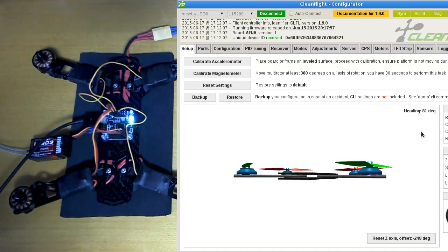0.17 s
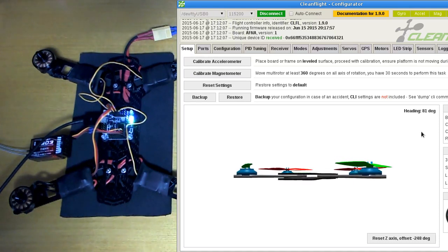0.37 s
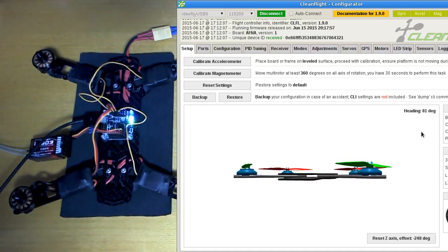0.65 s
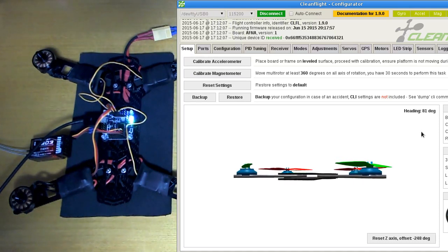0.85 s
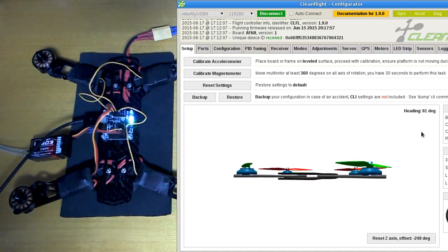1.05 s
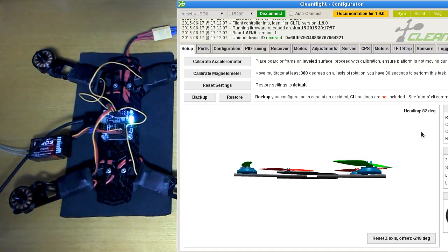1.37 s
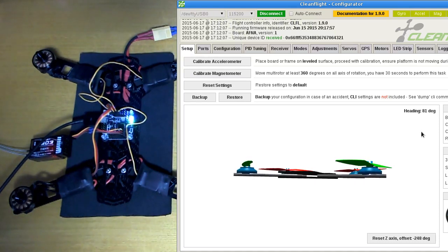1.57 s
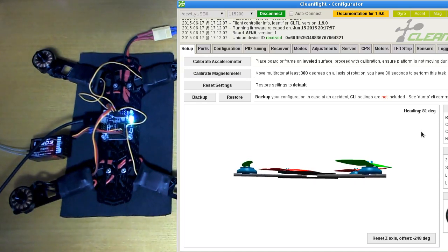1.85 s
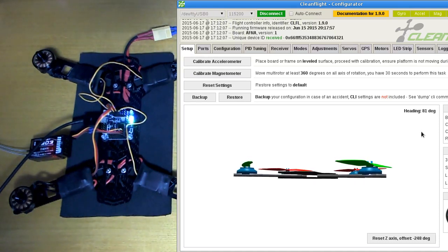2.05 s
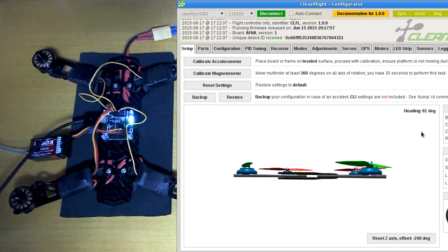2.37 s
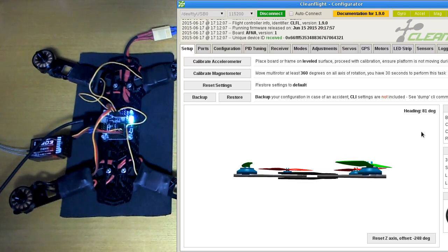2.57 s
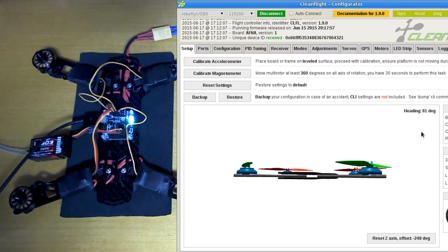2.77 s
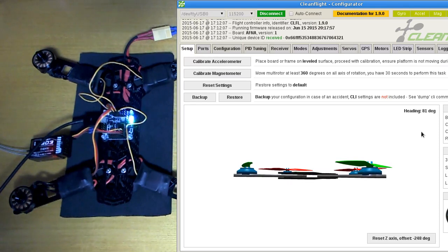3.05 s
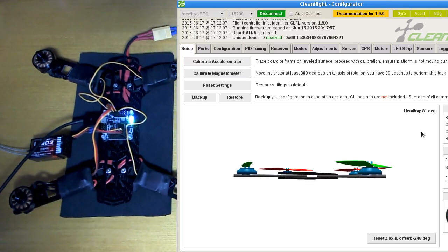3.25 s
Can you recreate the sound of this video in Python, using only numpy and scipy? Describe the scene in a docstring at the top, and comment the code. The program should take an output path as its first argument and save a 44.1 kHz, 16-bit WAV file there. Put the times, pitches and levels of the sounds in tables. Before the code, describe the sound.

Small propellerless drone motors whine loudly around 3 kHz, with a higher tone near 9 kHz, beating hums, buzz and bearing hiss. The pitch flutters rapidly until 0.7 s, then settles, sagging slightly. At 2.4 s a throttle stick ratchets briefly, clicking at 2.55 s as the whine cuts away. Rotors coast until 3.4 s, overtones sweeping down, a thin high ring fading, hiss dulling. Close, almost mono; faint room noise.

```python
"""Three small propellerless brushless motors run at steady throttle on a drone frame lying on a bench.
First one whines loudly, its speed hunting for 0.7 s; two others hum and beat; bearing noise hisses.
At 2.4 s the throttle stick ratchets down and clicks on its stop while the powered tones fade.
The motors then coast: overtones locked to each rotor sweep down through resonances of the frame arms,
a narrow high ring holds its pitch and the hiss loses treble. Room noise and mains hum lie beneath."""
import sys
import numpy as np
from scipy import signal
from scipy.fft import rfft, irfft
from scipy.io import wavfile

SR = 44100
rng = np.random.default_rng(int(sys.argv[2]) if len(sys.argv) > 2 else 0)


def waveform_to_disk(signal):
    """Save audio, clipped to [-1, 1], as 16-bit WAV at the path in sys.argv[1]."""
    frames = np.transpose(np.atleast_2d(signal))
    scaled = np.clip(frames, -1, 1) * 32767
    samples = np.round(scaled).astype(np.int16)
    wavfile.write(sys.argv[1], SR, samples)


N = 149940
TIME_S = np.arange(N) / SR
FREQ_HZ = np.arange(N // 2 + 1) * SR / N
CUTOFF_HZ = 15720


def from_db(db):
    """Decibels to gain."""
    return 10 ** (np.asarray(db) / 20)


def in_time(rows):
    """Each column of a curve, interpolated at every sample."""
    t_s, *columns = np.transpose(rows)
    return [np.interp(TIME_S, t_s, column) for column in columns]


def at_hz(points, hz):
    """Spectrum level in dB, interpolated over log frequency."""
    f_hz, db = np.transpose(points)
    return np.interp(np.log(np.maximum(hz, 1)), np.log(f_hz), db)


def noise(shape):
    """Gaussian noise of rms 1, spectrum weighted by shape(f)."""
    x = irfft(rfft(rng.standard_normal(N)) * shape(FREQ_HZ), N)
    return x / x.std()


def drift(corner_hz):
    """Slow random wander of rms 1."""
    return noise(lambda f: 1 / (1 + (f / corner_hz) ** 2))


def throb(rate_hz, crest_s, depth):
    """Cosine swing of peak depth, cresting at crest_s."""
    return depth * np.cos(2 * np.pi * rate_hz * (TIME_S - crest_s))


def tone(speed, order):
    """Sine of rms 1 at a multiple of the turning rate, muted above the cutoff."""
    hz = speed * order
    turns = np.cumsum(hz) / SR + rng.random()
    return np.sqrt(2) * np.sin(2 * np.pi * turns) * (hz < CUTOFF_HZ)


# room spectrum: f/Hz, relative level/dB
ROOM_SPECTRUM = [(20, -2), (60, -4.5), (130, -2), (230, 1), (400, -6.5), (1000, -4), (4000, -35),
                 (15000, -29)]


def room(level_db):
    """Steady room noise, mostly low."""
    return from_db(level_db) * noise(lambda f: from_db(at_hz(ROOM_SPECTRUM, f)))


def mains_hum():
    """Steady sine at the mains frequency."""
    return from_db(-64.5) * tone(np.full(N, 50), 1)


RATCHET_START_S, RATCHET_RISE_S, STOP_S = 2.38, .047, 2.553
RATCHET_START_HZ, RATCHET_SLOWING_PER_S, RATCHET_UNEVEN = 158, 1.1, .05
RATCHET_IMPULSE_DB, STOP_IMPULSE_DB = -44.5, -33
RUMBLE_HZ, RUMBLE_WIDTH_HZ = 116, 18.5
# low rumble of the hand: t/s, level/dB
RUMBLE = [(2.25, -71), (2.38, -49.5), (2.53, -46.5), (2.65, -53), (2.78, -80)]
# stick modes: f/Hz, gain/dB, t60/s
STICK_MODES = [(434, -3.5, .02), (680, -2, 0.023), (850, 6, 0.031), (1020, 5, 0.028), (1340, 5, 0.023)]


def throttle_stick():
    """Slowing ratchet ticks and a stop click excite the stick's modes; the hand rumbles as filtered noise."""
    slowing = np.exp(-RATCHET_SLOWING_PER_S * np.maximum(TIME_S - RATCHET_START_S, 0))
    rate_hz = RATCHET_START_HZ * slowing * (1 + RATCHET_UNEVEN * drift(77))
    ticks = np.diff(np.floor(np.cumsum(rate_hz) / SR), prepend=0)
    rise = np.clip((TIME_S - RATCHET_START_S) / RATCHET_RISE_S, 0, 1)
    clicks = ticks * rise * (TIME_S < STOP_S) * from_db(RATCHET_IMPULSE_DB)
    clicks[int(STOP_S * SR)] += from_db(STOP_IMPULSE_DB)
    rumble = noise(lambda f: 1 / (1 + ((f - RUMBLE_HZ) / RUMBLE_WIDTH_HZ) ** 4))
    out = from_db(in_time(RUMBLE)[0]) * rumble
    for k, (hz, db, t60_s) in enumerate(STICK_MODES):
        r = from_db(-60 / (t60_s * SR))
        w = 2 * np.pi * hz / SR
        ring = signal.lfilter([0, np.sin(w)], [1, -2 * r * np.cos(w), r * r], clicks + 1e-18)
        out = out + (-1) ** k * from_db(db) * ring   # alternating polarity
    return out


# rotor speeds: t/s, turning rate/Hz
LEAD_SPEED = [(0, 220.8), (.2, 221.7), (.6, 221.9), (.8, 219.7), (1.0, 218.2), (1.5, 216.2), (1.72, 215.85),
              (2.0, 215.8), (2.1, 216.5), (2.41, 216.2), (2.5, 212), (2.57, 204.5), (2.72, 171),
              (2.91, 124), (2.98, 103), (3.1, 83), (3.17, 71), (3.26, 57), (3.4, 36)]
SECOND_SPEED = [(0, 287.1), (1.5, 286.75), (2.41, 286.5), (2.55, 268), (2.7, 232), (2.8, 205), (2.9, 177),
                (3.1, 125), (3.4, 66)]
THIRD_SPEED = [(0, 276.5), (2.41, 275), (2.55, 254.3), (2.7, 214.9), (2.87, 159.9), (3.08, 110.5),
               (3.4, 50)]


def rotor(curve):
    """Turning rate in Hz with 0.02 % rms unsteadiness."""
    return in_time(curve)[0] * (1 + .0002 * drift(21.7))


def hunting():
    """Relative speed error of the lead motor: a flattened swing that ends at 0.72 s."""
    return .0035 * np.tanh(2 * throb(10.1, crest_s=.0739, depth=1)) * (TIME_S < .72)


# once-per-turn unbalance shaking the bench: t/s, second rotor level/dB, third rotor level/dB
SHAKE = [(0, -54.5, -62.5), (2.45, -55.5, -59), (2.6, -61, -50.5), (2.67, -40, -58), (2.76, -50, -43),
         (2.8, -41, -70), (2.83, -71, -58), (3.0, -74, -62), (3.09, -68, -51), (3.17, -61, -63),
         (3.4, -71, -68)]


def bench_shake(second, third):
    """Unbalance shakes the bench once per turn: one sine per rotor."""
    second_db, third_db = in_time(SHAKE)
    return from_db(second_db) * tone(second, 1) + from_db(third_db) * tone(third, 1)


# frame response: f/Hz, relative level/dB
FRAME = [(300, -50), (700, -39.5), (1000, -25), (1500, -16.5), (2100, -14.5), (2430, -4.5), (2720, -11.5),
         (3050, 4), (3350, -3.5), (4100, -8.5), (5000, -7.5), (6700, -10), (7900, -2), (8600, -4),
         (9050, 4.5), (9600, -6.5), (10600, -17.5), (14000, -19.5), (15700, -21.5)]
# hiss band edges: f/Hz
HISS_EDGES_HZ = (100, 2150, 2720, 4100, 6900, 10300, 17000)
# bearing hiss: t/s, then level/dB of the six bands between the edges, low to high
HISS = [(0, -45.5, -45, -32, -38, -32, -43.5), (2.45, -47, -46, -34, -36.5, -32.5, -44.5),
        (2.62, -48, -48, -33, -33.5, -30, -45), (2.8, -54, -42, -37, -34, -35.5, -51),
        (2.95, -53, -45, -36, -36, -41, -54.5), (3.15, -55.5, -41.5, -30.5, -45.5, -48.5, -63),
        (3.28, -57, -41, -41, -48.5, -56.5, -65), (3.4, -61, -41, -44.5, -59.5, -59, -73)]


def bearings(speed, pulsing):
    """Rolling noise in bands coloured by the frame, pulsing once per turn."""
    hiss = 0
    for low_hz, high_hz, db in zip(HISS_EDGES_HZ, HISS_EDGES_HZ[1:], in_time(HISS)):
        band = noise(lambda f: from_db(at_hz(FRAME, f)) * (f >= low_hz) * (f < high_hz))
        hiss = hiss + from_db(db) * band
    return hiss * (1 + pulsing * tone(speed, 1))


RING_HZ, RING_HALF_WIDTH_HZ = 9010, 210
# high ring: t/s, level/dB
RING = [(2.3, -52), (2.55, -35), (2.75, -39), (2.95, -42.5), (3.15, -55), (3.4, -64)]


def high_ring():
    """Narrow noise near 9 kHz at a fixed pitch, swelling at throttle-down and fading as the motors coast."""
    ring = noise(lambda f: 1 / (1 + ((f - RING_HZ) / RING_HALF_WIDTH_HZ) ** 2))
    return from_db(in_time(RING)[0]) * ring


# fade of powered tones and buzz: t/s, gain/dB
POWER = [(2.42, -1.5), (2.55, -3), (2.66, -20), (2.85, -22), (3.1, -67)]


def buzz(speed):
    """Roughness repeating every turn: a comb of harmonics, weighted by the frame at the starting speed."""
    orders = np.arange(1, int(CUTOFF_HZ / speed[0]))
    spread_db = 6.5 * np.clip(rng.standard_normal(100)[orders], -2, 2)
    strengths = from_db(at_hz(FRAME, orders * speed[0]) + spread_db)
    phases = np.exp(2j * np.pi * rng.random(100)[orders])
    turn = irfft(np.r_[0, strengths * phases], 2048)
    angle = np.cumsum(speed) / SR % 1
    comb = np.interp(angle, np.arange(len(turn)) / len(turn), turn / turn.std())
    return from_db(-36 + in_time(POWER)[0]) * comb


# arm modes: f/Hz, width/Hz, gain/dB
ARM_MODES = [(2425, 123, -1), (3044, 118, 3.5), (3480, 500, -8), (4730, 700, -9), (6000, 520, -21),
             (7900, 900, -20), (9200, 140, -17)]


def arms(x):
    """Arm resonances, high-passed; each rings as a falling overtone crosses it."""
    out = 0
    for k, (hz, width_hz, db) in enumerate(ARM_MODES):
        r = np.exp(-np.pi * width_hz / SR)
        poles = [1, -2 * r * np.cos(2 * np.pi * hz / SR), r * r]
        ring = (1 - r * r) / 2 * signal.lfilter([1, 0, -1], poles, x)
        out = out + (-1) ** k * from_db(db) * ring   # alternating polarity
    return signal.sosfilt(signal.butter(2, 2520, "high", fs=SR, output="sos"), out)


# coasting overtones: multiple of turning rate, relative level/dB
LEAD_COAST = [(14, 0), (24, 4), (28, -15), (36, 2.5), (42, 1.5), (60, -13), (72, -5)]
SECOND_COAST = [(12, -5), (13, -6), (14, -0.5), (24, -1), (28, -7), (36, -9)]
THIRD_COAST = [(12, 0.5), (14, -5.5), (28, -2), (48, -7)]
# coasting gain ahead of the arms: t/s, gain/dB
COAST = [(2.35, -53), (2.5, -42), (2.7, -32), (2.95, -31.5), (3.13, -33.5), (3.25, -39), (3.4, -43)]


def coasting(speed, tones, flutter_db):
    """Fluttering overtones of a free rotor plus bearing grit that pulses with each turn."""
    overtones = sum(from_db(db + flutter_db * drift(70)) * tone(speed, order) for order, db in tones)
    grit = from_db(-4) * noise(lambda f: f > 1500) * (1 + .5 * tone(speed, 1))
    return from_db(in_time(COAST)[0]) * (overtones + grit)


# powered tones: multiple of turning rate, level before POWER gain/dB
LEAD_TONES = [(16.96, -42.5), (19.88, -42.5), (22.12, -41), (23.33, -44.5), (32.67, -38), (35.89, -48),
              (36.12, -37), (37.68, -38), (38.55, -46), (40.42, -51), (43.56, -58), (45.11, -45),
              (45.83, -50.5), (53.44, -66), (57.66, -58), (58.48, -56), (60.67, -54), (65.33, -59)]
SECOND_TONES = [(2.086, -59.5), (7.437, -49), (12, -37.5), (12.123, -62), (13, -34.5), (14, -39.5),
                (14.53, -43.5), (17.63, -51), (18.25, -45), (19.66, -45.5), (21.35, -45), (21.97, -46),
                (30.4, -45.5), (54.2, -66)]
THIRD_TONES = [(2.229, -65), (12, -61), (14.32, -49)]


def powered(speed, tones, flutter_db):
    """Slot and bearing tones locked to the rotor, fading as the throttle closes."""
    power_db, = in_time(POWER)
    return sum(from_db(db + power_db + flutter_db * drift(22)) * tone(speed, order) for order, db in tones)


POLES, SWITCHINGS = 14, 42   # per turn
SIDEBAND_SPACING = .778   # turning rates
# beating: rate/Hz, crest t/s, depth/dB
POLE_THROB = (4.22, .137, 2.2)
SWITCH_THROB = (10.7, .105, 1.6)
# whine: t/s, then level/dB of pole tone, switching tone, first and second lower sideband
WHINE = [(0, -23.5, -33, -34.5, -29), (.65, -24, -33, -36.5, -27.5), (.9, -20, -28, -32.5, -36),
         (1.3, -21, -23, -36, -34), (1.8, -17.5, -23, -34.5, -53), (2.45, -19, -23, -32, -40),
         (2.52, -21.5, -26.5, -36, -48), (2.58, -38.5, -52, -55, -58), (2.68, -74, -78, -80, -80)]


def whine(speed, flutter_db):
    """Magnetic whine: beating pole and switching tones, two sidebands below the switching tone."""
    pole_db, switch_db, first_db, second_db = in_time(WHINE)
    parts = [(POLES, pole_db + throb(*POLE_THROB)),
             (SWITCHINGS, switch_db + throb(*SWITCH_THROB)),
             (SWITCHINGS - SIDEBAND_SPACING, first_db),
             (SWITCHINGS - 2 * SIDEBAND_SPACING, second_db)]
    return sum(from_db(db + flutter_db * drift(20)) * tone(speed, order) for order, db in parts)


def scene():
    """Room, throttle stick and three motors, almost in mono."""
    lead = rotor(LEAD_SPEED) * (1 + hunting())
    second, third = rotor(SECOND_SPEED), rotor(THIRD_SPEED)
    motors = ((lead, LEAD_TONES, LEAD_COAST),
              (second, SECOND_TONES, SECOND_COAST),
              (third, THIRD_TONES, THIRD_COAST))
    mid = room(level_db=-57.5) + mains_hum() + throttle_stick() + bench_shake(second, third)
    mid = mid + bearings(lead, pulsing=.075) + high_ring()
    for speed, driven, free in motors:
        mid = mid + buzz(speed) + arms(coasting(speed, free, flutter_db=2.5))
        mid = mid + powered(speed, driven, flutter_db=1.45)
    mid = mid + whine(lead, flutter_db=.5)
    side = from_db(-29.5) * bearings(second, pulsing=.12) + room(level_db=-86)
    return np.array([mid + side, mid - side])


def record(dry):
    """Brick-wall low-pass at the cutoff."""
    return irfft(rfft(dry) * (FREQ_HZ < CUTOFF_HZ), N)


dry = scene()
out = record(dry)
waveform_to_disk(out)
```